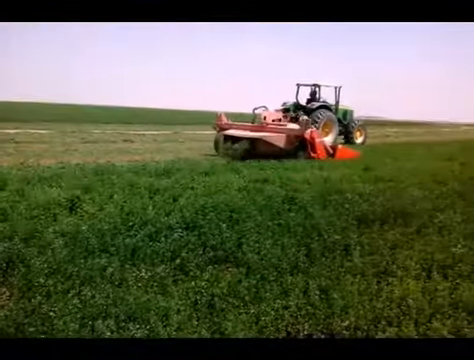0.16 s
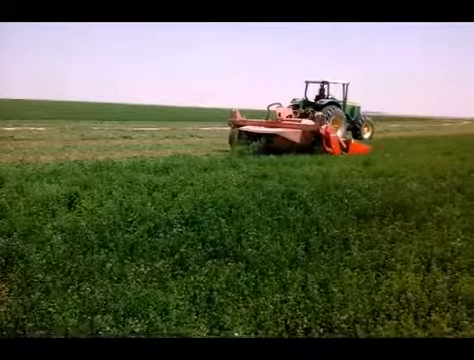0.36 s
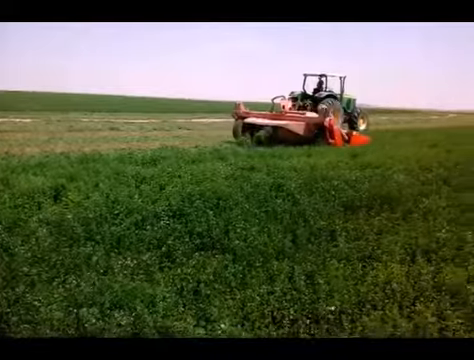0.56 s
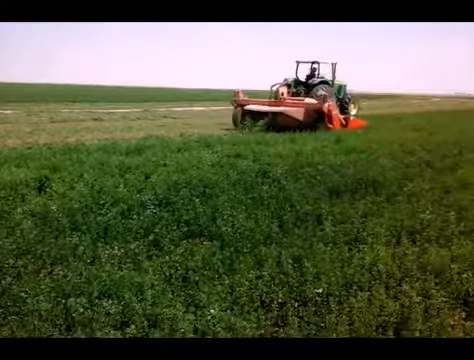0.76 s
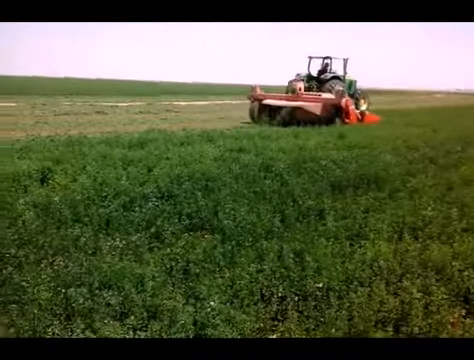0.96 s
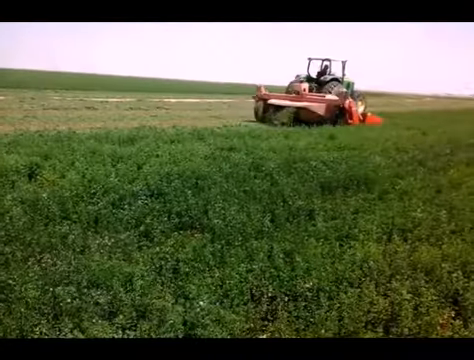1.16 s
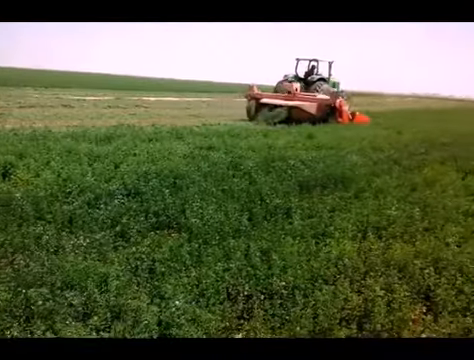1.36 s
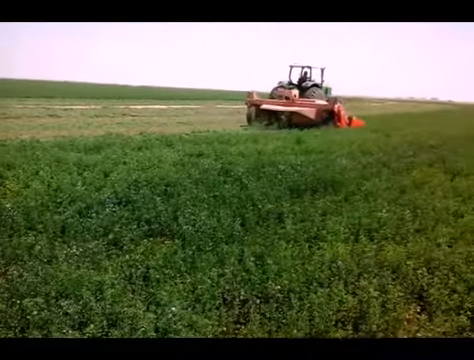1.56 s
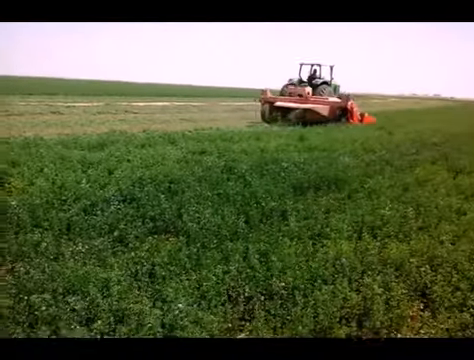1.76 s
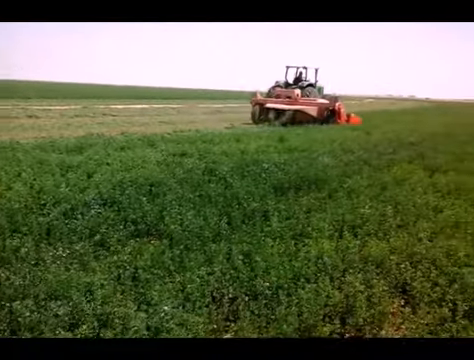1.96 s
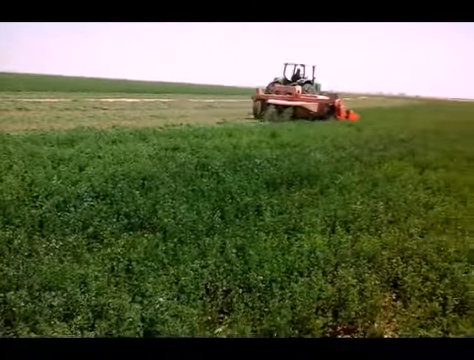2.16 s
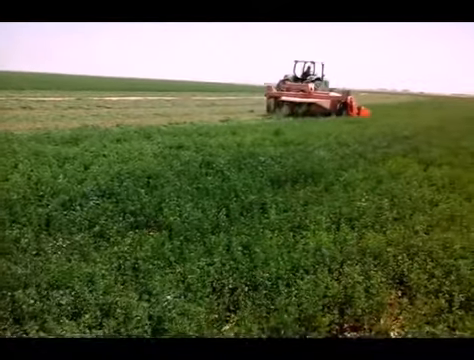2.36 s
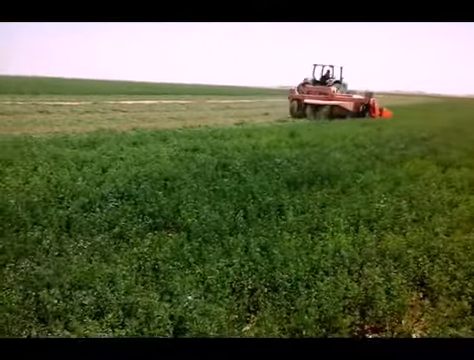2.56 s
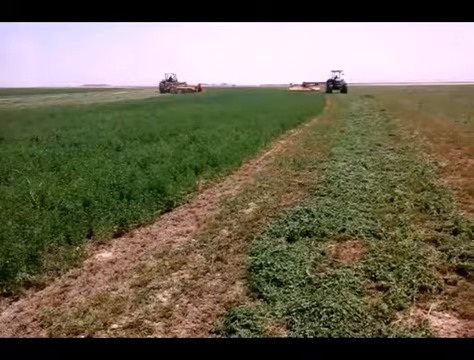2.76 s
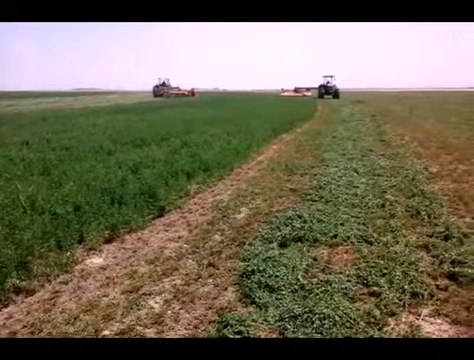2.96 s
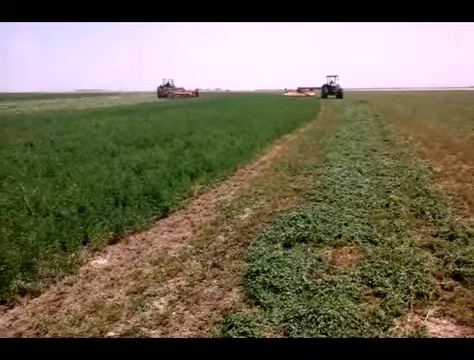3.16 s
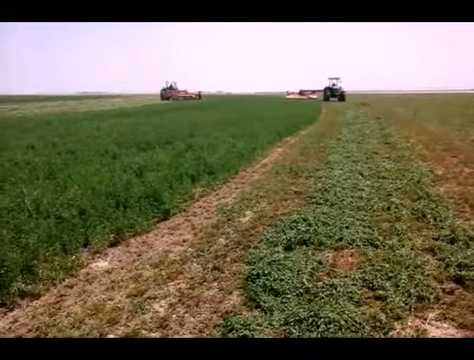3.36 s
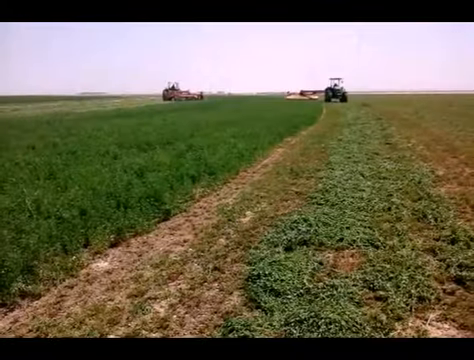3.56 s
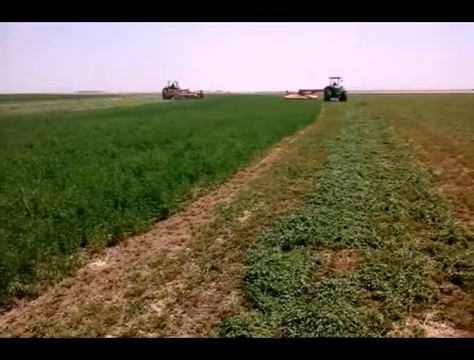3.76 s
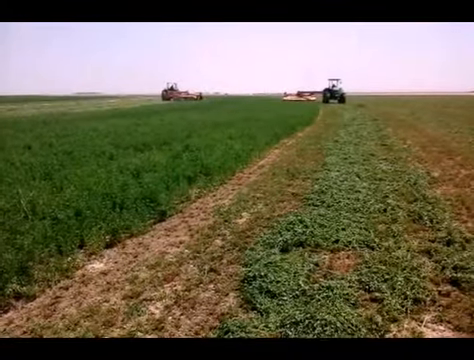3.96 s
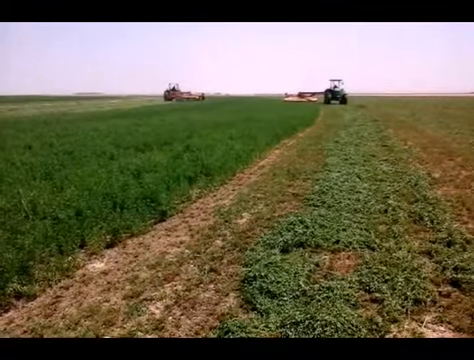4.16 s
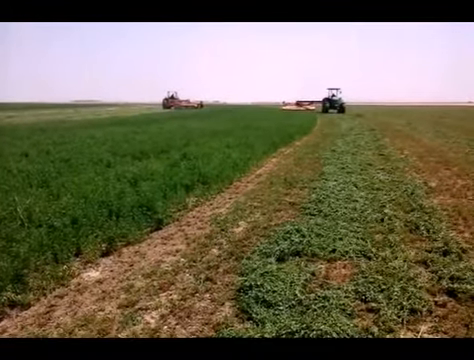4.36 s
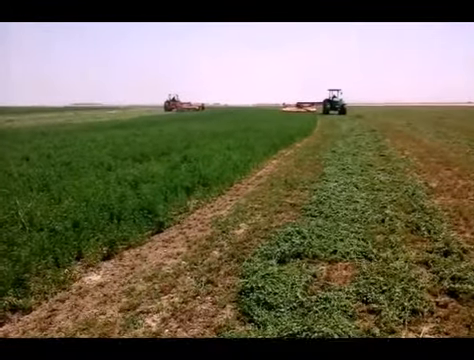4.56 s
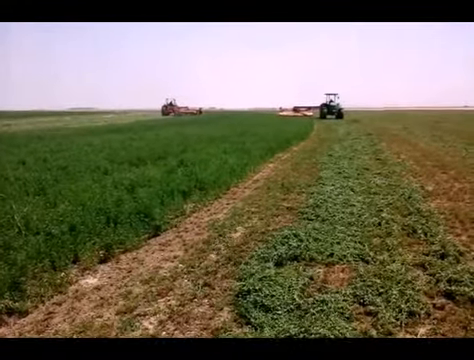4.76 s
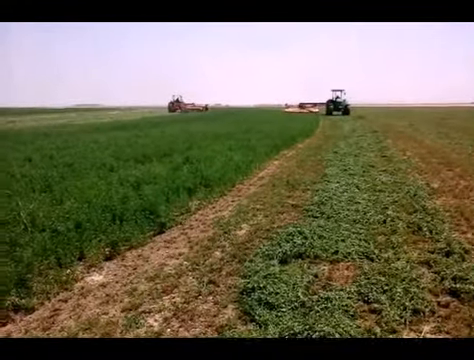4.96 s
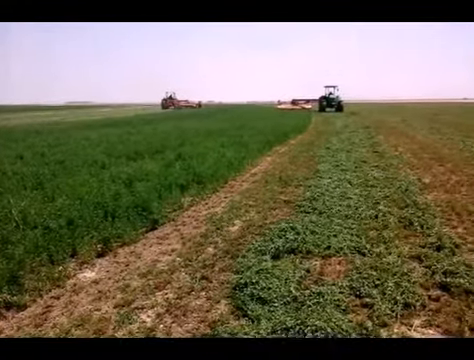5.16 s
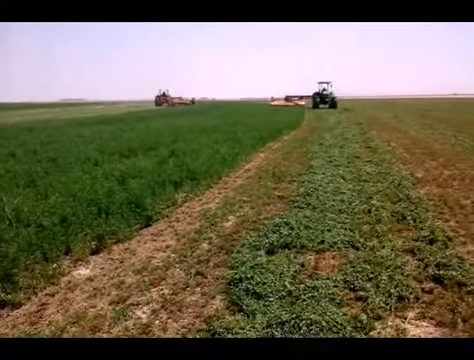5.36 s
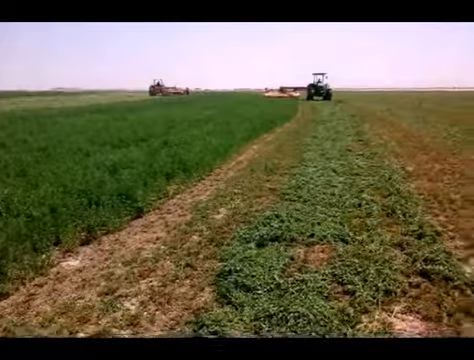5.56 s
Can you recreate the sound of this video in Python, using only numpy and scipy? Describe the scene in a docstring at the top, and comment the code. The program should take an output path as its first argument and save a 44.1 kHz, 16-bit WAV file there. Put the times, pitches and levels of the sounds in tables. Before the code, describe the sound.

Outdoors in an open hay field, a mower's rough roar and crop hiss cover a low diesel drone. Short metal squeaks, dry stalk clicks and a dull knock near one second pepper it. The roar eases as the tractor draws off, then cuts abruptly to a thinner, distant roar of two tractors. Late wind thumps and hisses on the right of a cheap handheld stereo microphone.

```python
"""Roar and hiss of mower knives in a hay field, close by, over the diesel drone of the tractor drawing away.
Steel squeaks, stalks snap and a knock sounds; then the view jumps to two far tractors, and wind hits the right side.
The roar is shaped noise, the engines are wavering firing orders, the squeaks and whines are gliding tones,
and the wind is swelling noise with brief low swings.
The two microphones are wired in opposite polarity, and the right one has a peak near 5.5 kHz."""
import sys
import numpy as np
from scipy import signal
from scipy.fft import rfft, irfft
from scipy.io import wavfile
from scipy.ndimage import uniform_filter1d

SR = 44100
rng = np.random.default_rng(int(sys.argv[2]) if len(sys.argv) > 2 else 0)


def bounce(signal):
    """Save signal as a 16-bit WAV file at the path given by the first command-line argument."""
    frames = np.transpose(np.atleast_2d(signal))
    limited = np.clip(frames, -1, 1)
    pcm = np.round(limited * 32767).astype(np.int16)
    wavfile.write(sys.argv[1], SR, pcm)


def boost(x):
    """Linear amplitude factor 10**(x/20) for a level x in decibels (scalar or array-like)."""
    u = np.asarray(x, float) / 20
    return 10 ** u


N = 248264
T = np.arange(N) / SR  # seconds
JUMP_S = 2.677  # from the near mower to the wide view

# How hard the mower works the crop. Each row: time in seconds, knife chop in dB, hiss in dB.
LOAD = [(0, 6, 5), (.6, 6, 5.5), (.72, 4.5, 0.5), (.88, 1.5, 1.05), (1.1, 4.5, 2.5), (1.29, 4, 3.5),
        (1.33, 1.5, -1), (2.4, 0, 0), (2.66, -0.5, -3), (2.69, 1, 2), (3.3, 0, 2.5), (3.7, 1, 4),
        (4.6, 1.5, 4.5), (5.1, 2, 4), (5.37, 1, 1), (5.63, 4, 4)]
# Middles of the roar's three layers, rumble, chop and hiss, in Hz.
LAYER_HZ = (250, 1200, 5000)
# The knives bite into thick clumps and the roar surges. Each row: time in seconds, surge in dB,
# half-length in seconds.
CLUMPS = [(0.18, 3, 0.059), (0.947, 4.5, 0.0229), (1.086, 3, 0.0282), (1.917, 5.5, 0.0304),
          (2.555, 2.5, 0.053), (2.65, 7, 0.0277)]
HISS_SHARE = 0.866  # of each surge, in the treble
# The upper middle of the roar thins for a moment.
LULL_S, LULL_HALF_S, LULL_HZ, LULL_OCTAVES, LULL_DB = 0.732, 0.076, 2630, 0.77, -4
# A band of the near roar thins out on the right, more as the mower draws off.
DIP_HZ, DIP_OCTAVES, DIP_DB_PER_S = 4090, 0.152, 7
# Colour of the near roar. Each row: frequency in Hz, relative density in dB per Hz.
NEAR_ROAR = [(30, -14), (110, -12.5), (150, -4), (290, -6.5), (390, -11.5), (650, -6), (820, -15),
             (1000, -13.5), (2450, -19), (6000, -15), (8000, -17), (10500, -23.5), (11800, -37),
             (12600, -86)]
# Colour of the far roar. Each row: frequency in Hz, relative density in dB per Hz.
FAR_ROAR = [(30, -13), (70, -18.5), (190, -4), (270, -9), (370, -15), (650, -17), (1400, -18), (4500, -25),
            (7000, -22.5), (10000, -34.5), (11200, -52), (12000, -74.5)]
NEAR_DB, FAR_DB = -29, -34.5  # median magnitude of each roar on the left

# Firing orders of the near engine. Each row: multiple of the firing rate, relative level in dB.
NEAR_ORDERS = [(1, -4), (2, 0), (3, -6), (4, -3), (6, -1), (8, -3), (9, -5)]
# The near engine slows under load until it settles, and fades as the tractor draws off.
START_HZ, SAG_HZ_PER_S, SETTLED_HZ = 77.1, 4.0, 69.1  # firing rate
ENGINE_DB, ENGINE_FADE_DB_PER_S = -32, 4.1
# The two far engines. Each row: firing rate in Hz, list of (multiple, level in dB).
FAR_ENGINES = [(80.6, [(2, -39), (4, -45)]), (72.7, [(1, -51), (2, -44), (3, -45)])]

# Squeaks of rubbing steel. Each row: start in seconds, length in seconds, start pitch in Hz, end pitch in Hz,
# level in dB at the right microphone.
SQUEAKS = [(0.118, 0.0563, 3174, 3338, -23.5), (0.152, 0.0555, 5400, 5565, -18.5),
           (0.517, 0.038, 6000, 6020, -22), (0.553, 0.0215, 5820, 5730, -20.5),
           (0.646, 0.062, 5520, 5600, -24), (1.048, 0.0366, 5500, 5500, -21.5),
           (1.244, 0.0603, 3120, 3212, -33), (1.595, 0.0355, 3194, 3327, -36.5),
           (1.778, 0.0354, 3175, 3213, -32), (2.243, 0.0376, 5570, 5437, -24),
           (2.361, 0.0885, 5440, 5650, -23.5), (2.739, 0.0563, 5376, 5452, -27.5),
           (3.393, 0.0634, 5395, 5498, -20.5), (4.361, 0.061, 5350, 5510, -29.5),
           (5.099, 0.0606, 5419, 5490, -26), (4.45, 0.088, 2080, 2067, -43),
           (5.086, 0.123, 2076, 2070, -43.5)]
# Squeak level on the left against the right. Each row: frequency in Hz, level in dB.
SQUEAK_LEFT = [(2000, -6.5), (3200, -19.5), (5500, -9.5), (6400, -19.5)]
# Squeaks that start in this band carry a strong octave: lowest and highest pitch in Hz.
OCTAVE_BAND_HZ = (3000, 3500)
OCTAVE_DB = 5  # octave against its squeak
# Stalks snapping on the knives. Each row: time in seconds, strength in dB ahead of the click's shape.
SNAPS = [(1.905, -17), (3.577, -20), (4.266, -19)]
# Something heavy knocks under the mower deck. Each row: time in seconds, level in dB, ring in Hz,
# half-length in seconds.
KNOCKS = [(0.946, -16, 231.6, 0.03)]
# Whines, hums and one swelling engine harmonic that come and go. Each row: start in seconds,
# length in seconds, pitch in Hz, waver width in Hz, level in dB at the right microphone.
WHINES = [(2.9, 1.1, 2688, 60, -46), (3.75, .75, 1970, 20, -46), (4.56, .8, 3105, 110, -41.5),
          (2.68, .6, 8410, 30, -54), (2.38, .28, 2100, 25, -46), (2.69, 2.9, 194.5, 5, -46.5),
          (1.7, .97, 623, 30, -44)]

# Wind bumps on the right microphone. Each row: time in seconds, swing in dB ahead of the low cut,
# frequency in Hz, half-length in cycles.
BUMPS = [(4.535, -23.5, 523, 0.86), (4.6544, -10, 164, 0.49), (4.6656, -12, 171, 0.33),
         (4.6766, -7, 193, 0.527), (4.6906, -14, 230.5, 1.09), (4.719, -14.5, 150, 0.35),
         (4.732, -13.5, 259, 0.25), (4.746, -17.5, 193, 0.62)]
# Bass of the right microphone's flaps. Each row: frequency in Hz, gain in dB.
LOW_CUT = [(25, -17), (60, 2.5)]
# Wind buffeting the right microphone with a rough low rush. Each row: peak in seconds, rise in seconds,
# fall in seconds, swell in dB.
BUFFETS = [(4.3, 0.052, 0.059, -43.5), (4.56, 0.026, 0.076, -42.5), (4.672, 0.016, 0.0222, -27),
           (4.735, 0.0248, 0.0353, -26)]
# Colour of that rush. Each row: frequency in Hz, relative density in dB per Hz.
BUFFET_RUSH = [(25, -3), (80, -1.5), (400, -7), (1300, -17), (3000, -31)]
# Lighter puffs scuffing the same port. Each row: peak in seconds, rise in seconds, fall in seconds, swell in dB.
SCUFFS = [(4.82, 0.042, 0.0227, -30), (5.265, 0.0237, 0.0213, -26)]
# Colour of the scuffs, weak in the bass. Each row: frequency in Hz, relative density in dB per Hz.
SCUFF_COLOUR = [(90, -15.5), (350, 1.5), (2500, -19)]
# Gusts hissing over the right microphone. Each row: peak in seconds, rise in seconds, fall in seconds, swell in dB.
GUSTS = [(4.7, 0.0517, 0.0708, -24), (4.79, 0.07, 0.0644, -25), (5.29, 0.0184, 0.06, -30)]
# Colour of the gusts. Each row: frequency in Hz, relative density in dB per Hz.
GUST_HISS = [(1500, -15.5), (5500, -6.5), (8000, -5.5), (11000, -30.5)]
# The thin top of the hiss swells later and lingers; a faint short puff of top hiss follows.
# Each row: peak in seconds, rise in seconds, fall in seconds, swell in dB.
FIZZ = [(4.8, 0.1004, .12, -31), (5.285, 0.039, 0.08, -37.5), (5.48, 0.0135, 0.022, -40)]
# Colour of that thin top. Each row: frequency in Hz, relative density in dB per Hz.
FIZZ_COLOUR = [(7000, -20), (11500, 0.5), (14500, -12.5)]

# Right microphone against the left. Each row: frequency in Hz, gain in dB.
RIGHT_MIC = [(100, -1.5), (1200, 2), (4000, 3.5), (5000, 4.5), (5600, 10.5), (6400, 3.5), (7200, -4),
             (9000, -5.5), (13000, -22.5)]
# The pair close to the mower. Each row: frequency in Hz, likeness from 0 to 1, lead of the right in radians.
NEAR_PAIR = [(44.7, 0.9, 0.194), (150, 0.96, 0.0017), (930, 0.93, 0.432), (3070, 0.66, 1.02),
             (5500, 0.17, 0.165)]
# The pair in the wide view. Each row: frequency in Hz, likeness from 0 to 1, lead of the right in radians.
FAR_PAIR = [(60.7, 1, 0.445), (186, 0.9617, -0.0264), (922, 0.9177, 0.5272), (2820, 0.442, 0.45),
            (4130, 0.256, 1.5), (7470, 0.62, 1.59), (9000, 0.041, 6.5)]
# The far tractors stand off to the right and lift its upper middle. Each row: frequency in Hz, gain in dB.
FAR_SIDE = [(2300, -1), (4600, 5), (5600, -0.5)]


def evened(x):
    """Scales to an rms of one."""
    return x / np.sqrt(np.mean(abs(x) ** 2) + 1e-20)


def bell(x):
    """Gaussian hump, one at the middle."""
    return np.exp(-x ** 2)


def read(points, hz):
    """Reads a table's columns at hz, along a logarithmic frequency scale."""
    f, *values = np.transpose(points)
    return np.squeeze([np.interp(np.log(hz + 1), np.log(f + 1), v) for v in values])


def coloured(x, points):
    """Filters by a table of gains, without phase shift."""
    return irfft(rfft(x) * boost(read(points, np.fft.rfftfreq(N, 1 / SR))), N)


def wander(count, hz):
    """Slow complex chance, smooth above hz."""
    r = np.exp(-np.pi * hz / SR)
    x = rng.standard_normal(count) + 1j * rng.standard_normal(count)
    once = signal.lfilter([1], [1, -r], x)
    return evened(signal.lfilter([1], [1, -r], once))


def add(mix, s, sound):
    """Lays a sound into the mix at s seconds."""
    part = mix[:, round(s * SR):][:, :sound.shape[1]]
    part += sound[:, :part.shape[1]]


def at_pair(tone, hz, pair):
    """Sets a complex tone at both microphones, the right shifted by the pair's phase lead."""
    lead = read(pair, hz)[1]
    return np.array([tone.real, (tone * np.exp(1j * lead)).real])


def crop_load(t):
    """Levels in dB of rumble, chop and hiss as the knives meet thin and thick crop."""
    s, chop, hiss = np.transpose(LOAD)
    surge_db = sum(db * bell((t - at) / half) for at, db, half in CLUMPS)
    chop_db = np.interp(t, s, chop) + surge_db
    hiss_db = np.interp(t, s, hiss) + HISS_SHARE * surge_db
    rumble_db = 0.575 * uniform_filter1d(chop_db, 60)  # a weaker, smoothed copy of the chop
    return np.array([rumble_db, chop_db, hiss_db])


def roar(colour, db, pair, patchy_db, flicker_db, dip_db_per_s=0, side=None):
    """Knives and crop: noise in drifting patches, with a clatter that flickers across the treble."""
    frames, hz = N // 128 + 5, np.fft.rfftfreq(512, 1 / SR)
    t = (np.arange(frames) - 2) * 128 / SR
    a, b, c, d, patches = rng.standard_normal((frames, 257, 5)).T
    patches = evened(uniform_filter1d(uniform_filter1d(patches, 5, 0), 14, 1))
    clatter = uniform_filter1d(rng.exponential(1, frames), size=4)
    clatter = evened(clatter - clatter.mean())

    # the three layers blend over the octaves
    share = read(np.column_stack([LAYER_HZ, np.eye(3)]), hz)
    field_db = share.T @ crop_load(t) + patchy_db * patches
    field_db += flicker_db * share[2][:, None] * clatter
    lull_band = bell(np.log2((hz + 1) / LULL_HZ) / LULL_OCTAVES)
    field_db += LULL_DB * np.outer(lull_band, bell((t - LULL_S) / LULL_HALF_S))
    # the right-hand dip deepens from halfway to the jump
    dip_band = bell(np.log2((hz + 1) / DIP_HZ) / DIP_OCTAVES)
    dip_db = dip_db_per_s * np.outer(dip_band, np.maximum(t - JUMP_S / 2, 0))

    noise = np.array([a + 1j * b, c + 1j * d]) * boost([field_db, field_db - dip_db])
    noise = signal.istft(noise, nperseg=512, noverlap=384)[1][:, 256:][:, :N]
    left, other = rfft(coloured(noise, colour))
    # the right shares part of the left's noise and has some of its own
    same, lead = read(pair, np.fft.rfftfreq(N, 1 / SR))
    same = np.clip(same, 0, 1)
    right = same * left * np.exp(1j * lead) + np.sqrt(1 - same ** 2) * other
    right = coloured(irfft(right, N), RIGHT_MIC)
    if side:
        right = coloured(right, side)
    left = irfft(left, N)
    return boost(db) * np.array([left, right]) / np.median(abs(left))


def engine(hz, orders, pair, rough, waver_hz):
    """Exhaust pulses as firing orders, each swelling and wavering a little on its own."""
    turns = np.cumsum(hz * np.ones(N)) / SR
    out = np.zeros((2, N))
    for k, db in orders:
        waver = 1 + rough * wander(N, waver_hz)
        tone = boost(db) * 2 ** .5 * np.exp(2j * np.pi * k * turns) * waver
        out += at_pair(tone, k * np.mean(hz), pair)
    return out


def squeak(length, start_hz, end_hz, db, rough):
    """A short gliding stick-slip tone with an uneven grip."""
    count = round(length * SR)
    turns = np.cumsum(np.linspace(start_hz, end_hz, count)) / SR
    grip = 1 + rough * wander(count, 154)
    shape = np.sin(np.pi * np.linspace(0, 1, count) ** .7) ** .8
    tone = np.exp(2j * np.pi * turns) * grip * shape
    level = boost([[db + read(SQUEAK_LEFT, start_hz)], [db]])
    return 2 ** .5 * level * (tone * np.exp([[2.6j], [0]])).real  # left turned by 2.6 radians


def chatter(count, db):
    """Faint stray squeaks of the loose knives, fading as the mower draws off."""
    out = np.zeros((2, N))
    for when, pitch, size in rng.random((count, 3)):
        hz = 5200 + 1300 * pitch
        add(out, when * JUMP_S, squeak(0.0177, hz, hz, db - 6 * size - 5 * when, rough=1.0))
    return out


def snaps(per_s, db, hz, width_s):
    """Stalks break in dry clicks of a cycle or two, sharpened by the right microphone's peak."""
    strength = boost(db + 4.1 * np.minimum(rng.exponential(1, N), 2))
    train = (rng.random(N) < per_s / SR) * strength
    for s, snap_db in SNAPS:
        train[round(s * SR)] = boost(snap_db)
    t = T[:100] - T[50]
    click = np.sin(2 * np.pi * hz * t) * bell(t / width_s)
    clicks = np.convolve(train, click, "same")
    return np.array([clicks / 2, coloured(clicks, RIGHT_MIC)])


def knock(s, db, hz, half_s, spread):
    """A dull burst of noise round the deck's ring, nearly alike at both microphones."""
    ring = np.exp(2j * np.pi * hz * T) * wander(N, spread * hz)
    return boost(db) * bell((T - s) / half_s) * at_pair(ring, hz, NEAR_PAIR)


def whine(length, hz, waver_hz, db, steady, drift_hz):
    """A whining or humming tone that drifts slowly in pitch, blurred by moving air."""
    count = round(length * SR)
    pitch = hz + waver_hz / 2 * wander(count, drift_hz).real
    blur = evened(steady + wander(count, waver_hz))
    tone = np.exp(2j * np.pi * np.cumsum(pitch) / SR) * blur * signal.windows.tukey(count, .2)
    lead = np.clip(2 * np.pi * hz * 1.1e-4, .6, 2.3)  # radians, from a 0.11 ms lead of the right
    level = boost([[db - read(RIGHT_MIC, hz)], [db]])
    return 2 ** .5 * level * (tone * np.exp([[0], [1j * lead]])).real


def bump(s, db, hz, cycles, leak_db, ragged):
    """A gust flaps the diaphragm: one brief swing with a ragged edge; little reaches the left."""
    turns = hz * (T - s)
    swing = ragged * wander(N, 2 * hz).real - np.cos(2 * np.pi * turns)
    return boost(db + np.array([[leak_db], [0]])) * swing * bell(turns / cycles)


def gusts(rows, colour, leak_db):
    """Air rushing past the right port, swelling and dying with a quick flutter; little reaches the left."""
    swell = sum(boost(db) * bell((T - s) / np.where(T < s, rise, fall)) for s, rise, fall, db in rows)
    hiss = coloured(rng.standard_normal((2, N)), colour)
    hiss = evened(coloured(hiss, RIGHT_MIC))
    flutter = boost(2.8 * wander(N, 30).real)
    return boost([[leak_db], [0]]) * swell * flutter * hiss


def scene():
    """The near mower, a jump to the wide view, then details and wind on top."""
    near = np.clip((JUMP_S - T) / .004, 0, 1)
    firing_hz = np.maximum(START_HZ - SAG_HZ_PER_S * T, SETTLED_HZ)
    drone = engine(firing_hz, NEAR_ORDERS, NEAR_PAIR, rough=.3, waver_hz=4)
    drone *= boost(ENGINE_DB - ENGINE_FADE_DB_PER_S * T)
    near_roar = roar(NEAR_ROAR, NEAR_DB, NEAR_PAIR, patchy_db=1.5, flicker_db=1.3083,
                     dip_db_per_s=DIP_DB_PER_S)
    mix = near * (drone + chatter(count=45, db=-32.0) + near_roar)

    far_drone = sum(engine(hz, orders, FAR_PAIR, rough=.3, waver_hz=3) for hz, orders in FAR_ENGINES)
    far_roar = roar(FAR_ROAR, FAR_DB, FAR_PAIR, patchy_db=1.3161, flicker_db=0.9923, side=FAR_SIDE)
    mix += (1 - near) * (far_drone + far_roar)

    for s, length, start_hz, end_hz, db in SQUEAKS:
        add(mix, s, squeak(length, start_hz, end_hz, db, rough=.5))
        if OCTAVE_BAND_HZ[0] < start_hz < OCTAVE_BAND_HZ[1]:
            add(mix, s, squeak(length, 2 * start_hz, 2 * end_hz, db + OCTAVE_DB, rough=.5))
    mix += snaps(per_s=25, db=-31, hz=4800, width_s=.00015)
    mix += sum(knock(*row, spread=0.45) for row in KNOCKS)
    for s, *row in WHINES:
        add(mix, s, whine(*row, steady=.9, drift_hz=9))

    mix += coloured(sum(bump(*row, leak_db=-18.5, ragged=0.54) for row in BUMPS), LOW_CUT)
    mix += gusts(BUFFETS, BUFFET_RUSH, leak_db=-16)
    mix += gusts(SCUFFS, SCUFF_COLOUR, leak_db=-20.5)
    mix += gusts(GUSTS, GUST_HISS, leak_db=-30.5)
    return mix + gusts(FIZZ, FIZZ_COLOUR, leak_db=-40)


def band_limit(x):
    """A steep low-pass at the top of the band."""
    return signal.sosfilt(signal.butter(12, 14610, fs=SR, output="sos"), x)


def record(dry):
    """The right microphone is wired backwards, so its polarity is flipped."""
    mix = dry * [[1], [-1]]
    return band_limit(mix)


dry = scene()
out = record(dry)
bounce(out)
```